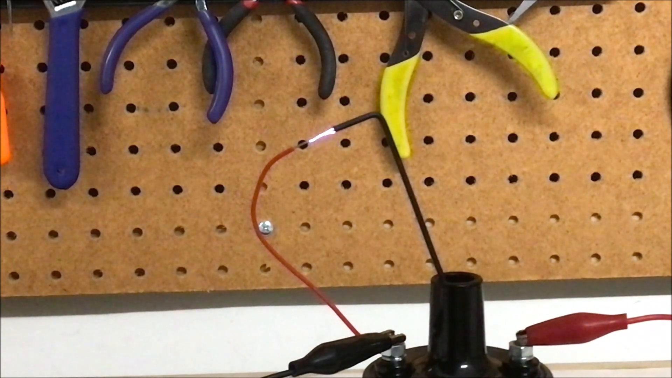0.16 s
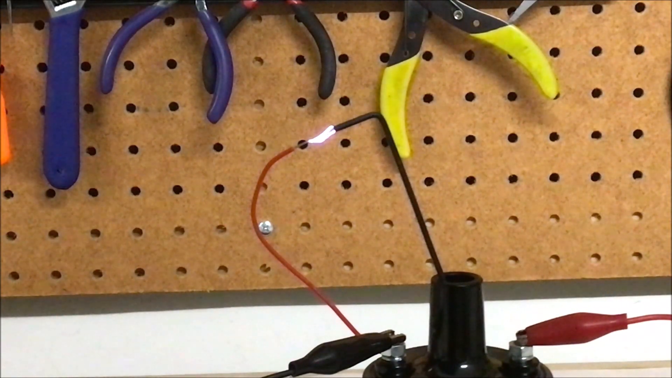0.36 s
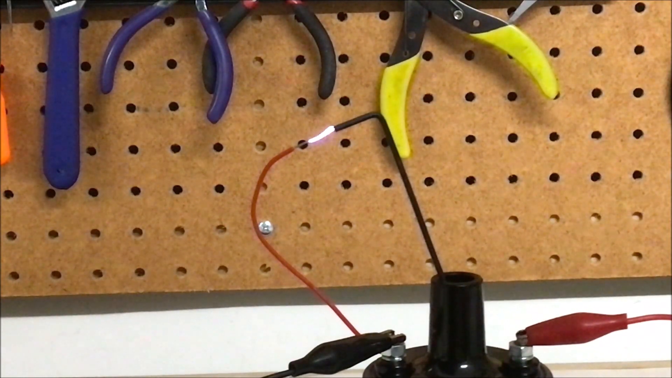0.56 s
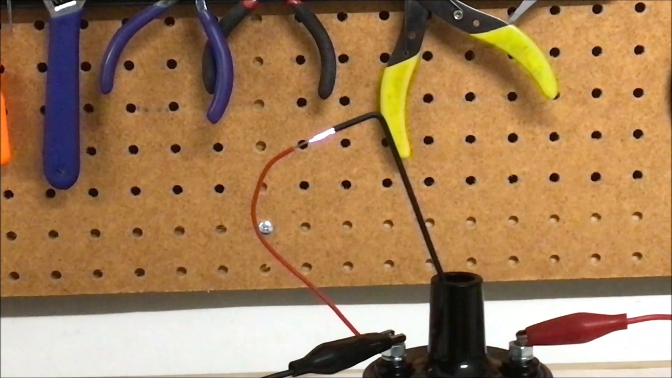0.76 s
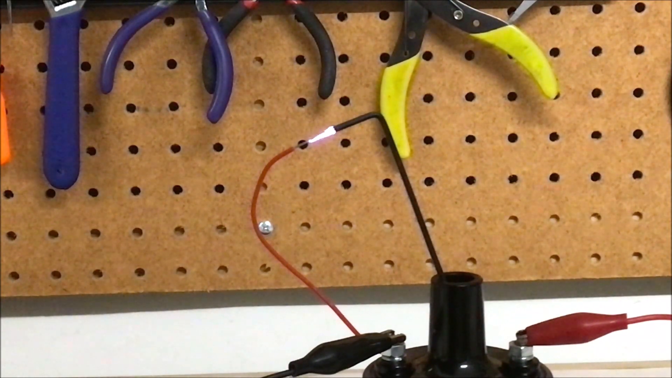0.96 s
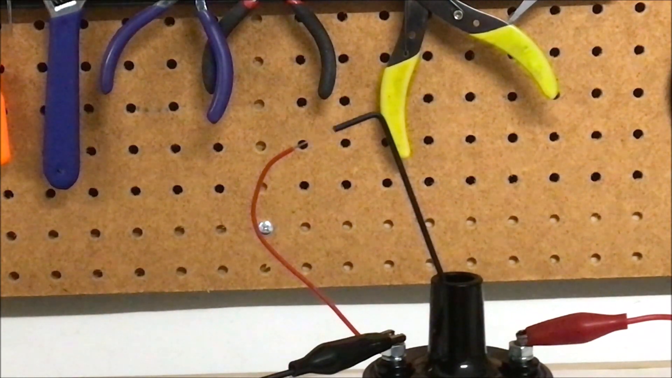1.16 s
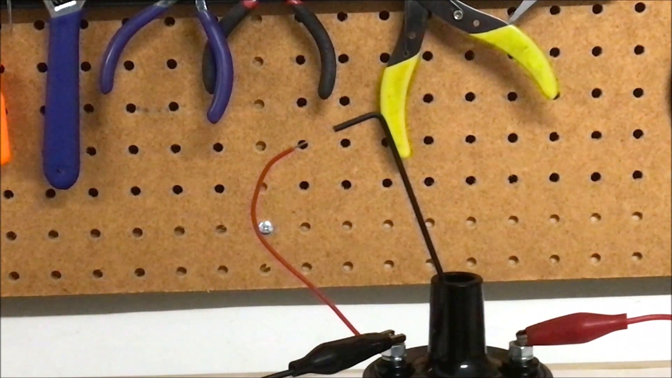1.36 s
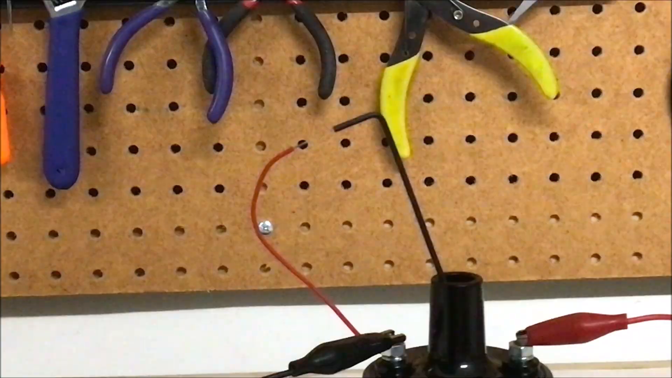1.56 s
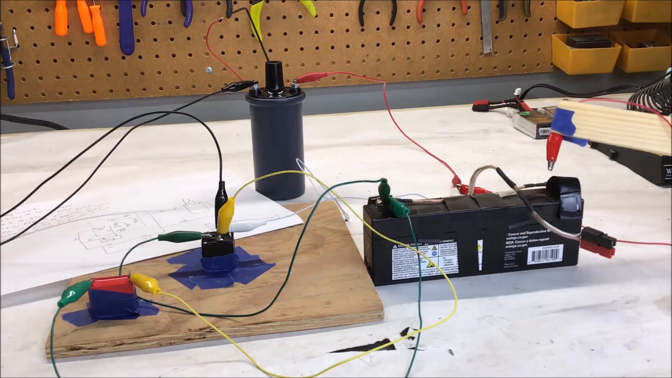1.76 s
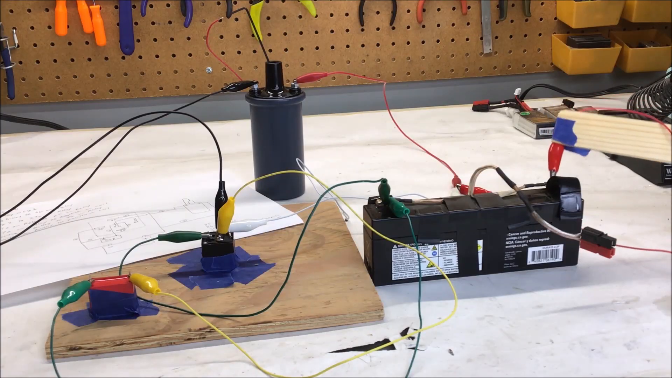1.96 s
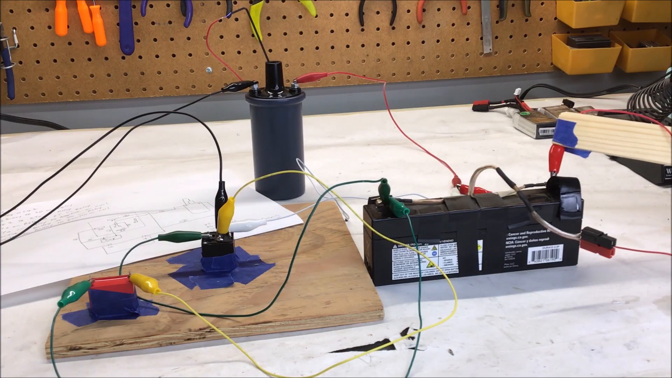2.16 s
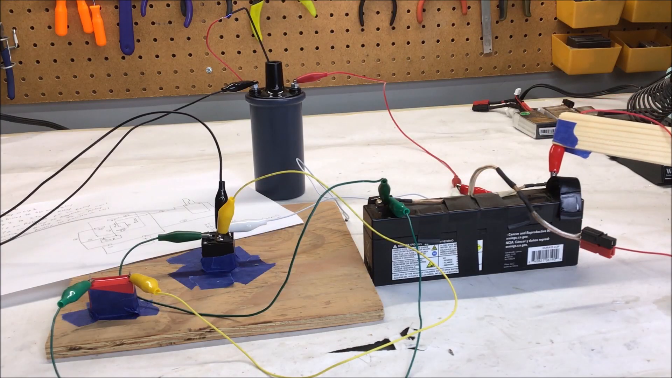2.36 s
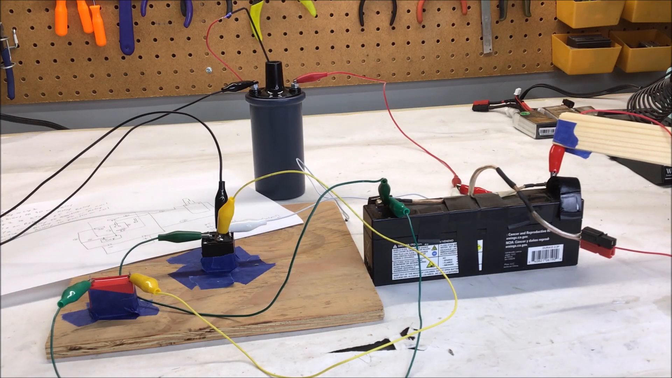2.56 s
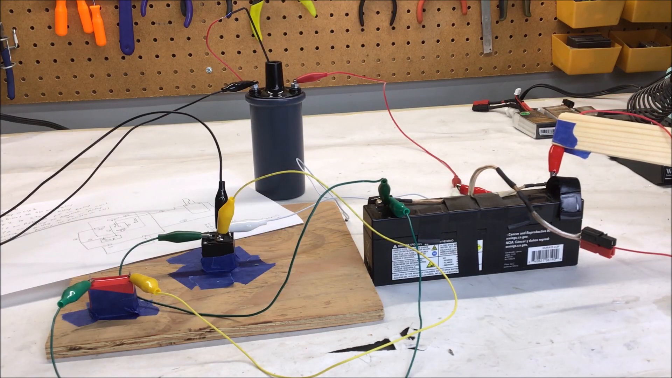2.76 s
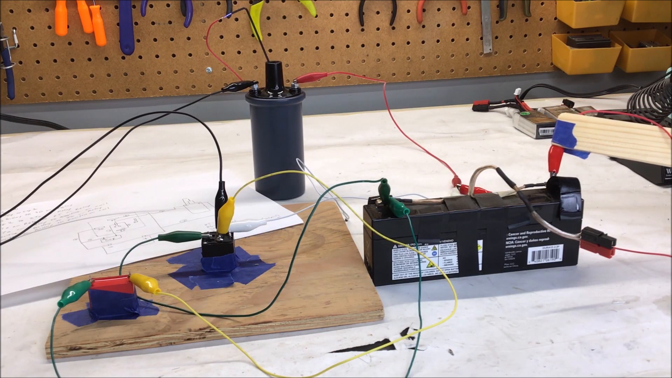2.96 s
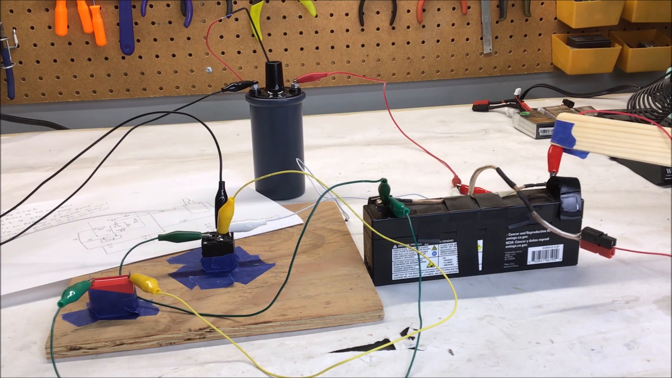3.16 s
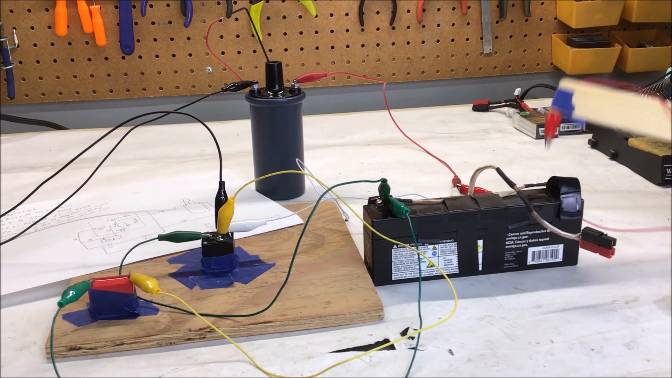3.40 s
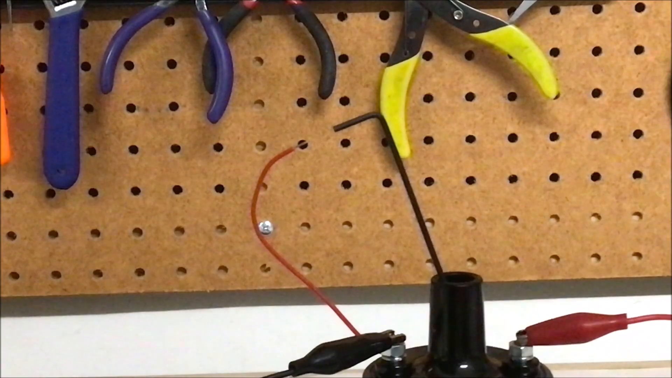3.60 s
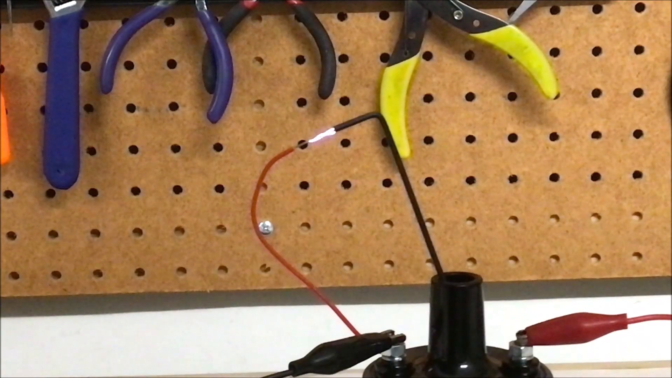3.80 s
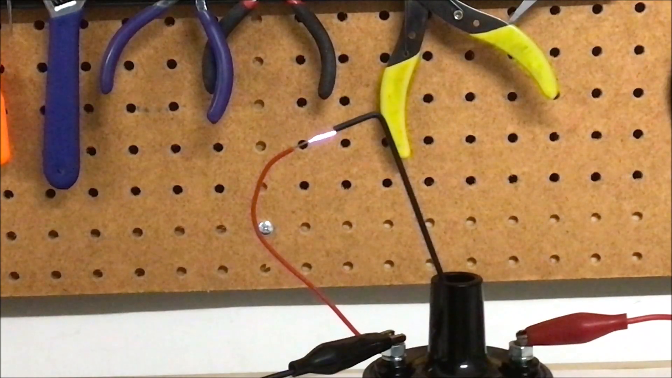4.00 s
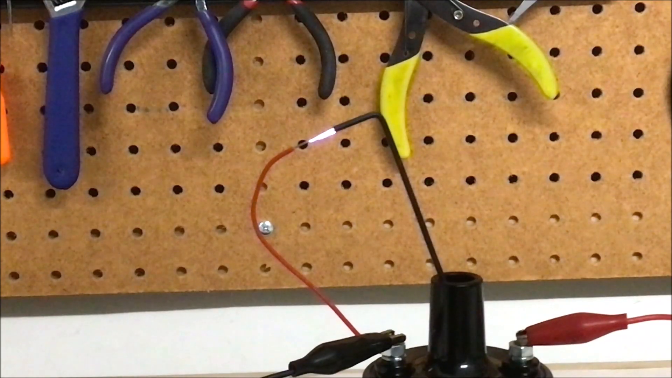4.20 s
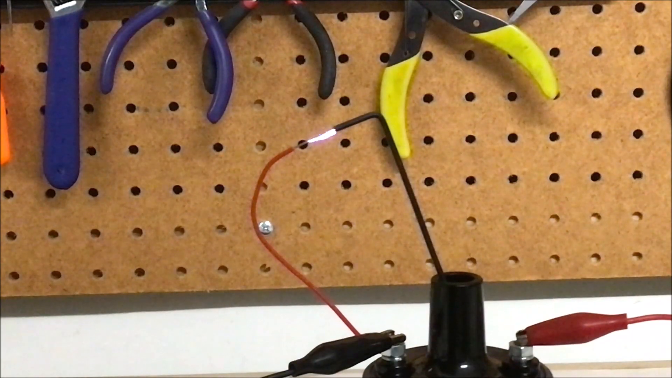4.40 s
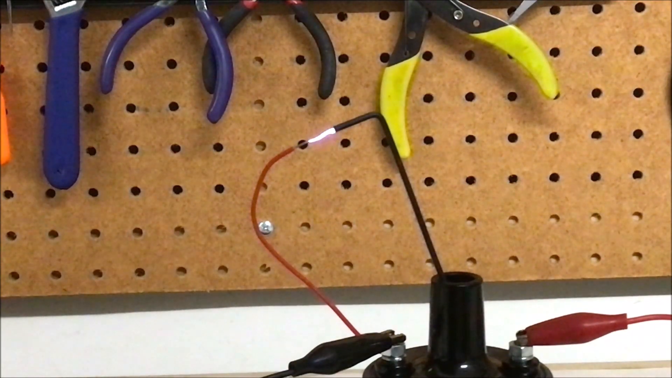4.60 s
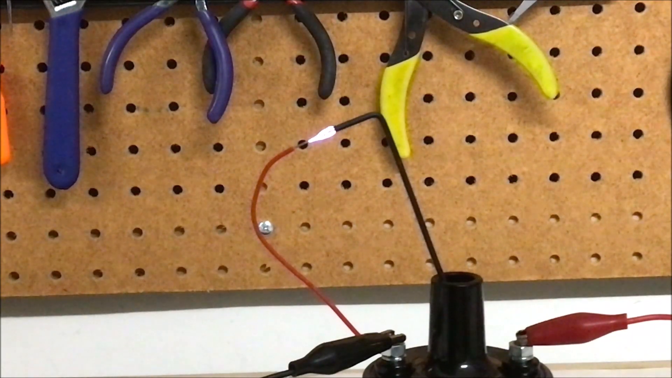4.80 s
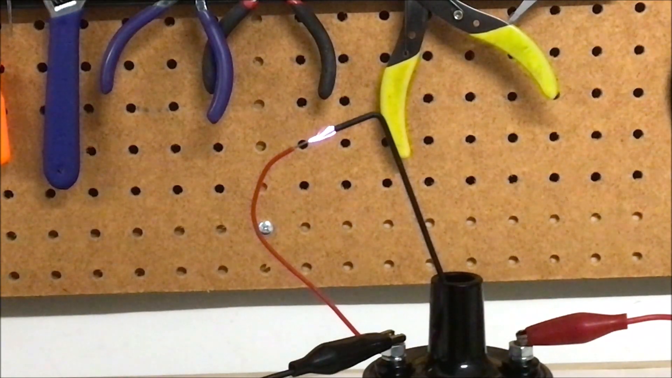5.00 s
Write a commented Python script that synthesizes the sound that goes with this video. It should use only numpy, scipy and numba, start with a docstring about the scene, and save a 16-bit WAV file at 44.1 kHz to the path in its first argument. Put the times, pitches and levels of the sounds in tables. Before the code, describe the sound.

From the start, sharp electric cracks come close to the microphone in a ragged buzz, around 136 per second, with uneven stutters, doubled snaps and tiny breaks. Each is hard and bright, with short echoes from pegboard and bench and a little room ring; now and then the texture turns hollow and whistly. Firing stops at about 1.28 s, and the tail fades into faint low room tone. From 1.7 s the perspective is wider and nearly quiet. A light metal tick at 2.19 s starts irregular, roomier sparks, mixed with strong, uneven low thuds as discharges jolt the microphone. At 3.41-3.47 s they collapse into a blurred, thin, whistling crackle with a dull thud. Quiet returns, switching back close at about 3.58 s. A soft tick at 3.83 s precedes scattered snaps from 3.9 s, soon thickening into the close, harsh, stuttering buzz that lasts until about 5.04 s.

```python
"""Sharp cracks in a ragged buzz come first: sparks heard close to a small gap in a workshop.
A relay drives an ignition coil; each discharge is a click, echoed by pegboard and bench as the room rings.
After a short silence a wide place near the wiring is heard, where discharges also jolt the microphone
circuit with thuds, ending in a blurred crackle; then the close place returns. Metal ticks and a soft
room tone lie beneath; at moments few spectral lines survive and all sounds hollow and whistly."""
import sys
import numpy as np
from scipy import signal
from scipy.fft import rfft, irfft
from scipy.io import wavfile
from scipy.ndimage import uniform_filter1d
from numba import njit

SR = 44100
rng = np.random.default_rng(int(sys.argv[2]) if len(sys.argv) > 2 else 0)


def generate_wav(signal):
    """Clip the signal to [-1, 1] and save it as 16-bit WAV at the path in sys.argv[1]."""
    frames = np.transpose(np.atleast_2d(signal))
    scaled = np.clip(frames, -1, 1) * 32767
    pcm = np.round(scaled).astype(np.int16)
    wavfile.write(sys.argv[1], SR, pcm)


def level_to_linear(level):
    """Convert decibel levels to linear amplitude factors, elementwise."""
    exponent = np.asarray(level, float) / 20
    return 10 ** exponent


N = 222440

BEAT_S = .00734  # the relay's swing
BOUNCE_S, LAG_S = (.0031, .0044), (.0025, .0065)  # range of a bounce gap, and of a lagging swing's delay
CRACKLE_START_S, CRACKLE_END_S = 3.41, 3.471  # blurred, fading crackle near the end of the wide place


def relay(first, last, bounces=0, lags=0):
    """Intermittent contact: it opens on the beat, bounces sooner or lags later, giving one burst's sparks."""
    pick, pick_lag, spread = rng.random((3, 64))
    delay = (pick_lag < lags) * np.interp(spread, [0, 1], LAG_S)
    bounce = np.interp(spread ** 3, [0, 1], BOUNCE_S)
    gaps = np.where(pick < bounces, bounce, BEAT_S + delay)
    times = first + np.r_[0, np.cumsum(gaps)]
    return np.r_[times[times < last - BOUNCE_S[0]], last]


def misfires(times, longest_s=.05):
    """Missed periods of the oscillator: relay beats that fall in a short gap between sparks."""
    gaps = zip(times[:-1], times[1:])
    missed = [np.arange(a + BEAT_S, b - BEAT_S / 4, BEAT_S) for a, b in gaps if b - a < longest_s]
    return np.concatenate(missed)


def sparks(times, weak, echoes, points, space, level_db, weak_db, dull_hz=4500, hasty_db=-4,
           board=1, tilt_db=1.8, tilt_hz=6500):
    """Impulsive radiation: each crack, the duller weak snaps, the cracks' echoes and the room."""
    level_chance, time_chance, echo_chance, tilt_chance = rng.standard_normal((len(times), 4)).T
    wander_ms, scatter_db = .008, 1.5
    # the coil has stored less when the last spark was under a beat ago
    hasty = np.diff(times, prepend=0) < .8 * BEAT_S
    size = level_to_linear(level_db + scatter_db * level_chance + hasty_db * hasty)
    times = times + .00004 * time_chance  # the relay's beat is slightly uneven
    snaps = clicks(weak, level_to_linear(weak_db + scatter_db * rng.standard_normal(len(weak))))
    dull_snaps = signal.lfilter(*signal.butter(2, dull_hz, fs=SR), snaps)
    # the arc takes a new path each time, so some cracks are brighter than others
    sheen = clicks(times, size * (level_to_linear(tilt_db * tilt_chance) - 1))
    sheen = signal.lfilter(*signal.butter(2, tilt_hz, "high", fs=SR), sheen)
    direct = clicks(times, size) + dull_snaps + sheen
    out = direct + room(direct, **space) + board * panel(direct)
    for ms, share, low_hz in echoes:
        echo = clicks(times + (ms + wander_ms * echo_chance) / 1000, share * size)
        out = out + signal.lfilter(*signal.butter(2, low_hz, "high", fs=SR), echo)
    return through(out, colour(points))


# unbroken firing at the close place: (first spark [s], last spark [s], share of gaps that are
# bounces [0-1], share of swings that lag [0-1]); shares left out are 0
FIRING_BURSTS = [(.0025, .0127, 0, 1), (.0263, .0431, 0, .4), (.0548, .0824, 0, .2), (.0945, .1246, .2, .3),
                 (.1365, .1805), (.1922, .2236, .7, .2), (.2278, .2663, .1), (.2768, .2856),
                 (.299, .3273, 0, .7), (.342, .3739, 0, .6), (.3839, .4772, .85), (.491, .5449, .1),
                 (.5567, .6037, .1), (.6187, .6363, 0, .4), (.6394, .67, .9), (.6852, .7473, 0, .2),
                 (.7576, .8095), (.819, .839, .9), (.8586, .888, .2), (.9076, .9212), (.936, .958),
                 (.9721, .9721), (.9868, 1.0266, 0, .2), (1.0385, 1.0531), (1.0563, 1.0919, .9),
                 (1.0992, 1.1398, .3, .2), (1.1472, 1.1991, .6), (1.2044, 1.2336, .2),
                 (1.2484, 1.2823, .4, .2), (3.9022, 3.912, .5), (3.9336, 3.9336), (3.9528, 3.9601),
                 (3.9795, 4.0331, .2, .3), (4.0577, 4.0577), (4.0868, 4.1192, .1), (4.1338, 4.1632, .2),
                 (4.1753, 4.2693), (4.2886, 4.3033), (4.3156, 4.3682, .2, .5), (4.3761, 4.4055),
                 (4.4228, 4.4909, 0, .2), (4.4942, 4.5606, .3, .2), (4.5709, 4.6336, .2, .2),
                 (4.6575, 4.7134, .1, .3), (4.7283, 4.7508, 0, 1), (4.7643, 4.7811, 0, .5),
                 (4.7929, 4.8205, 0, .3), (4.8326, 4.8626, .2, .2), (4.8745, 4.9185),
                 (4.9303, 4.9617, .7, .1), (4.9659, 5.0044, .1), (5.0148, 5.0371, 0, .8)]
# echoes off pegboard, bench and coil: (delay [ms], signed share [ratio], high-pass corner [Hz])
CLOSE_REFLECTIONS = [(.14, -0.19, 499), (0.499, -0.15, 501), (1.9, 0.2, 499), (2.2, 0.6, 7010)]
# relative spectrum of a crack close to the gap: (frequency [Hz], level [dB])
CLOSE_SPECTRUM = [(90, -45), (300, -20.5), (550, -13.5), (1000, -8), (1900, -5), (2150, -9), (2900, -1.5),
                  (4000, -1), (5000, -0.5), (5400, -4), (5800, -10), (7500, -19.5), (9300, -9.5),
                  (11000, .3), (13000, -6.5), (15500, -19), (17000, -48)]


def close_sparks():
    """Near field of the gap: direct cracks dominate, with the board's modes and dense early scatter."""
    times = np.concatenate([relay(*burst) for burst in FIRING_BURSTS])
    space = dict(clutter_db=-22.5, clutter_t60=.05, hall_db=-47)
    return sparks(times, misfires(times), CLOSE_REFLECTIONS, CLOSE_SPECTRUM, space,
                  level_db=5.0, weak_db=1.5)


# wide place's sparks and their kicks to the microphone circuit: (time [s], signed size [ratio])
DISCHARGES = [(2.1979, 0.74), (2.2051, -0.1), (2.2212, -0.02), (2.2288, 0.1), (2.2433, -0.35),
              (2.2507, 0.45), (2.258, -0.08), (2.273, -0.41), (2.2833, -0.27), (2.2906, 0.42),
              (2.3052, -0.52), (2.3127, 0.68), (2.32, -0.37), (2.3324, 0.66), (2.3356, -0.15),
              (2.3388, -0.67), (2.3833, 0.45), (2.3907, -0.17), (2.401, -0.33), (2.4083, 0.65),
              (2.4156, -0.71), (2.4231, 0.23), (2.4305, -0.22), (2.4556, 0.4), (2.4633, 0.0),
              (2.471, -0.34), (2.4953, 0.34), (2.503, -0.24), (2.5102, 0.08), (2.5176, -0.03),
              (2.5278, -0.0), (2.5322, 0.01), (2.547, -0.15), (2.55, -0.22), (2.5802, 0.05), (2.5948, 0.53),
              (2.611, -0.2), (2.6305, 0.37), (2.6378, -0.5), (2.641, 0.0), (2.6521, 0.1), (2.6762, -0.06),
              (2.6986, 0.21), (2.7119, -0.57), (2.7194, 0.5), (2.7267, 0.13), (2.734, -0.42),
              (2.7414, 0.04), (2.749, -0.18), (2.7611, -0.18), (2.7684, 0.06), (2.7759, 0.46),
              (2.7832, -0.39), (2.7905, 0.35), (2.808, 0.12), (2.8113, -0.17), (2.8313, -0.03),
              (2.8465, -0.23), (2.8566, 0.18), (2.8598, -0.01), (2.8716, -0.19), (2.8792, 0.73),
              (2.8898, 0.07), (2.905, -0.58), (2.9125, -0.0), (2.9185, -0.31), (2.9262, -0.12),
              (2.9368, 0.18), (2.9398, -0.07), (2.9519, 0.44), (2.9664, -0.39), (2.9912, 0.03),
              (2.9989, 0.36), (3.0063, -0.15), (3.0137, 0.01), (3.0209, 0.36), (3.0282, -0.5),
              (3.0357, -0.11), (3.0433, 0.28), (3.0507, -0.05), (3.0728, -0.33), (3.0874, 0.65),
              (3.1049, -0.54), (3.1122, -0.25), (3.1198, -0.01), (3.1229, -0.0), (3.1263, 0.0),
              (3.1468, -0.01), (3.1541, 0.56), (3.1688, -0.12), (3.1718, -0.16), (3.176, 0.19),
              (3.2018, -0.3), (3.2093, 0.21), (3.2169, 0.19), (3.2276, 0.02), (3.2396, -0.23),
              (3.2501, 0.2), (3.2573, 0.58), (3.2646, -0.31), (3.2822, -0.67), (3.2898, -0.14),
              (3.2974, -0.02), (3.3005, 0.0), (3.3046, -0.01), (3.3121, -0.01), (3.3241, 0.57),
              (3.3418, -0.39), (3.36, 0.33), (3.3702, 0.07), (3.3895, -0.37), (3.3946, -0.03),
              (3.4019, -0.04)]
# echoes at the wide place: (delay [ms], signed share [ratio], high-pass corner [Hz])
WIDE_REFLECTIONS = [(0.331, 0.23, 508), (2.428, 0.85, 6490)]
# relative spectrum of a crack at the wide place: (frequency [Hz], level [dB])
WIDE_SPECTRUM = [(200, -24), (1000, -8), (2500, -6), (6500, -5.5), (7700, -5.5), (8900, 3.5), (9800, -4.5),
                 (11000, 3.5), (13000, 1), (15500, 1.5), (17000, -49)]


def wide_sparks(crackle):
    """Reverberant field: cracks at the wide place, more of them carried by the room."""
    # a burst before the wide place opens leaves only its tail
    earlier = 1.22 + BEAT_S * np.arange(38)
    far, kick = np.transpose(DISCHARGES)
    missed = misfires(far)
    crackle_db = np.interp(crackle, [3.41, 3.435, 3.47], [-8., 4., -10.])
    weak_db = np.r_[np.full(len(missed), -12.), crackle_db]
    swamped_db = 2.2 * np.r_[0 * earlier, np.abs(kick)]  # a hard kick swamps the crack
    space = dict(clutter_db=-25, clutter_t60=0.0068, hall_db=-35.3, lasting_db=-0.5, soaked_hz=12001.0)
    return sparks(np.r_[earlier, far], np.r_[missed, crackle], WIDE_REFLECTIONS, WIDE_SPECTRUM, space,
                  level_db=6.3 - swamped_db, weak_db=weak_db, dull_hz=11900, board=0)


def crackle_times(gap_s=.0036):
    """Jittered pulse train: a blurred crackle at short gaps near the end of the wide place."""
    times = np.arange(CRACKLE_START_S, CRACKLE_END_S, gap_s)
    return times + gap_s / 4 * rng.standard_normal(len(times))


# relative spectrum of a kick to the microphone circuit: (frequency [Hz], level [dB])
JOLT_SPECTRUM = [(20, -33), (70, -23.5), (130, -4.5), (200, 2), (350, -3), (450, -10.5), (650, -12.5),
                 (850, -20), (1200, -18.5), (3000, -28), (8000, -43), (20000, -59)]


def jolts(crackle, rumble_size=0.028, level_db=26.5):
    """Electrical coupling: each discharge kicks the microphone circuit one way or the other."""
    late_thud = clicks([3.4495], [0.2])  # one more dull thud near the end of the wide place
    # soft low rumble under the blurred crackle: random kicks, low-passed
    rumble = clicks(crackle, rumble_size * rng.standard_normal(len(crackle)))
    dull = signal.lfilter(*signal.butter(4, 700, fs=SR), late_thud + rumble)
    kicks = clicks(*np.transpose(DISCHARGES))
    return level_to_linear(level_db) * through(kicks + dull, colour(JOLT_SPECTRUM))


# modes of the pegboard panel behind the gap: (frequency [Hz], level [dB], t60 [s])
PANEL_MODES = [(415, -27, 0.02), (675, -39, 0.05), (955, -38, 0.055), (2000, -39, 0.035)]


def panel(x):
    """Modal resonance: each crack rings the board's modes, which decay exponentially."""
    t = np.arange(SR // 4) / SR
    ring = 0
    for hz, db, t60 in PANEL_MODES:
        ring = ring + level_to_linear(db) * np.sin(2 * np.pi * hz * t) * np.exp(-np.log(1000) * t / t60)
    return through(x, ring)


# reverberation time of the room: (frequency [Hz], t60 [s])
ROOM_DECAY = [(300, 0.34), (1400, 0.44), (4000, 0.53), (9000, 0.4), (14000, 0.15)]


def room(x, clutter_db, clutter_t60, hall_db, lasting_db=-5, soaked_hz=7000):
    """Diffuse reverberation: noise shaped by decaying energy, from nearby clutter and then the walls."""
    t = np.arange(SR) / SR
    hz, t60 = np.transpose(ROOM_DECAY)
    fall = 2 * np.log(1000) * t
    power = x ** 2
    # the arc wanders, so only part of the grain repeats from crack to crack
    clutter_power = np.abs(through(power, np.exp(-fall / clutter_t60)))
    fresh = rng.standard_normal(N) * np.sqrt(clutter_power)
    repeated = through(x, rng.standard_normal(SR) * np.exp(-fall / clutter_t60 / 2))
    out = level_to_linear(clutter_db) * fresh + level_to_linear(clutter_db + lasting_db) * repeated
    out = signal.lfilter(*signal.butter(1, soaked_hz, fs=SR), out)  # clutter returns less treble
    for centre in 125 * 2 ** np.arange(0, 7.1, .5):  # half-octave bands
        edges = [centre / 2 ** .25, centre * 2 ** .25]
        bandpass = signal.butter(2, edges, "band", fs=SR, output="sos")
        band = signal.sosfilt(bandpass, rng.standard_normal(N))
        decay = np.exp(-fall / np.interp(np.log(centre), np.log(hz), t60))
        decay = decay * np.clip(t / 0.003, 0, 1)  # the walls answer gradually
        out = out + level_to_linear(hall_db) * band * np.sqrt(np.abs(through(power, decay)))
    return out


# the lead touches the battery post: (time [s], click level before room and filter [dB])
POST_TOUCHES = [(2.194, -34.5), (3.833, -33)]


def ticks():
    """Impact excitation: light metal touches with a short ring of the room."""
    s, db = np.transpose(POST_TOUCHES)
    touch = clicks(s, level_to_linear(db))
    metal = colour([(600, -10), (2400, -9.5), (3500, -4.0), (4700, -8), (5600, -22.5),
                    (9000, -29.5), (16000, -32.5)])
    return through(touch + room(touch, -19.5, 0.05, -37), metal)


# relative spectrum of the room tone: (frequency [Hz], level [dB])
TONE_SPECTRUM = [(40, -49), (125, -20.5), (165, -6), (210, -11.5), (300, -13.5), (450, -20.5),
                 (2000, -28.5), (16000, -36)]


def room_tone(level_db=-66.8):
    """Stationary noise: white noise shaped by a fixed filter."""
    return level_to_linear(level_db) * through(rng.standard_normal(N), colour(TONE_SPECTRUM))


def colour(points, size=4096):
    """Minimum phase: the causal response of energy 1 with the given (frequency [Hz], level [dB]) shape."""
    hz, db = np.transpose(points)
    grid = np.arange(size // 2 + 1) * SR / size + 1
    cepstrum = irfft(np.log(level_to_linear(np.interp(np.log(grid), np.log(hz), db))))
    # folding the cepstrum onto positive time makes the response causal
    cepstrum[1:size // 2] *= 2
    cepstrum[size // 2 + 1:] = 0
    response = irfft(np.exp(rfft(cepstrum)))[:size // 2]
    return response / np.sqrt(np.sum(response ** 2))


def clicks(times, sizes):
    """Band-limited impulses: windowed sincs placed between samples."""
    lead_s = 5 / SR  # the crossovers delay the sharp edge
    place = (np.asarray(times) - lead_s) * SR
    index = np.floor(place).astype(int)[:, None] + np.arange(-7, 9)
    offset = index - place[:, None]
    kernel = np.sinc(offset) * np.cos(np.pi * offset / 16) ** 2
    weighted = np.asarray(sizes)[:, None] * kernel
    return np.bincount(index.ravel(), weighted.ravel(), N + SR)[:N]


def through(x, response):
    """Linear filtering: convolution, cut to length."""
    return signal.fftconvolve(x, response)[:N]


def heard(spans):
    """Gating: 1 inside the spans, with 2 ms edges."""
    t = np.arange(N) / SR
    gate = 0
    for a, b in spans:
        opening = np.clip((t - a) / .002 + (a == 0), 0, 1)
        gate = gate + opening * np.clip((b - t) / .002, 0, 1)
    return gate


# when the close place is heard: (start [s], end [s])
CLOSE_TIMES = [(0, 1.645), (3.577, 5.1)]
# when the wide place is heard: (start [s], end [s])
WIDE_TIMES = (1.707, 3.577)


def scene():
    """Superposition: each place sums its sources over the room tone, and the places alternate."""
    crackle = crackle_times()
    background = room_tone() + ticks()
    close = close_sparks() + background
    wide = wide_sparks(crackle) + jolts(crackle) + background
    mix = heard(CLOSE_TIMES) * close + heard([WIDE_TIMES]) * wide
    return mix[None]


@njit
def follow(x, attack, release):
    """Envelope detection: a level that rises fast and falls slowly."""
    out, level = np.empty(len(x)), 1e-9
    for i in range(len(x)):
        level += (abs(x[i]) - level) * (attack if abs(x[i]) > level else release)
        out[i] = level
    return out


# moments when few spectral lines of the finished mix survive, sounding hollow and whistly:
# (centre [s], gain between the kept lines [dB])
HOLLOW_MOMENTS = [(.233, -9), (.439, -8), (.4622, -26), (.53, -9), (.617, -12), (.83, -17), (1.063, -9),
                  (1.193, -9), (2.985, -6), (3.4098, -10), (3.433, -60), (3.4562, -40), (4.17, -19),
                  (4.267, -10), (4.458, -12), (4.567, -11), (4.97, -10)]


def hollow(x, evenness=.3, low_hz=750, low_db=6, kept_db=2.5, thin_hz=8000, count=28, size=2048):
    """Sparse spectrum: at listed moments the mix keeps few lines and any loud bass; the rest is cut."""
    window, out = signal.windows.kaiser_bessel_derived(size, 4 * np.pi), x.copy()
    is_low = np.arange(size // 2 + 1) * SR / size < low_hz
    for s, rest_db in HOLLOW_MOMENTS:
        span = slice(int(s * SR) - size // 2, int(s * SR) + size // 2)
        lines = rfft(x[span] * window)
        power = np.abs(lines) ** 2
        broad = uniform_filter1d(power, size=40)
        whole = is_low & (broad > level_to_linear(low_db) ** 2 * np.mean(power[~is_low]))
        rank = power / broad ** evenness * ~whole
        if CRACKLE_START_S < s < CRACKLE_END_S:  # here only sparse treble lines are kept: a thin whistle
            rank[:int(thin_hz * size / SR)] = 0
        peaks = signal.find_peaks(rank, distance=5)[0]
        kept = peaks[np.argsort(rank[peaks])[-count:]]
        gain = np.where(whole, 1, level_to_linear(rest_db))
        # the kept lines are scaled by the power that the cut takes away
        lost_power = (1 - level_to_linear(rest_db) ** 2) * np.sum(power[~whole])
        gain[kept] = level_to_linear(kept_db) * np.sqrt(lost_power / np.sum(power[kept]))
        out[span] += window * irfft(lines * (gain - 1))
    return out


def band_limit(x):
    """A steep low-pass at the top of the band."""
    return signal.sosfilt(signal.butter(12, 16820, fs=SR, output="sos"), x)


def record(dry, knee_db=-40, squeeze=0.14, attack_s=0.0032, release_s=0.18):
    """Compression and dispersion: loud sound is ducked, then each click spreads into a falling chirp."""
    level = follow(dry[0], 1 / (attack_s * SR), 1 / (release_s * SR))
    x = dry * np.minimum(1, level_to_linear(knee_db) / level) ** squeeze
    # bands split and rejoined at each crossover act as an all-pass filter
    for hz in (110, 593, 5300):
        poles = signal.butter(2, hz, fs=SR)[1]
        x = signal.lfilter(poles[::-1], poles, x)
    x = x / (1 + (x / .84) ** 8) ** (1 / 8)  # the highest peaks are rounded
    x = signal.sosfilt(signal.ellip(8, .2, 60, 16300, fs=SR, output="sos"), x)
    finished = hollow(x[0])[None]
    return band_limit(finished)


dry = scene()
out = record(dry)
generate_wav(out)
```